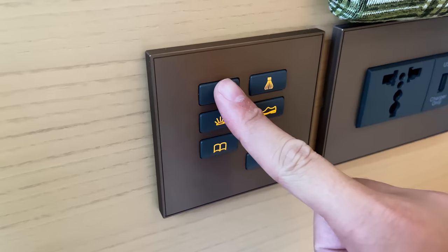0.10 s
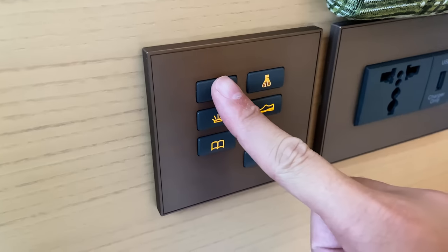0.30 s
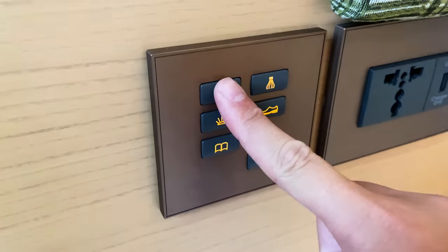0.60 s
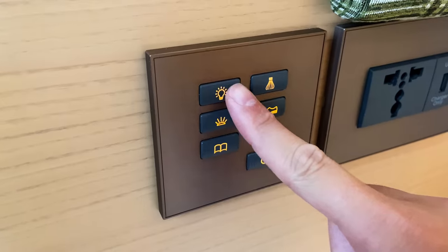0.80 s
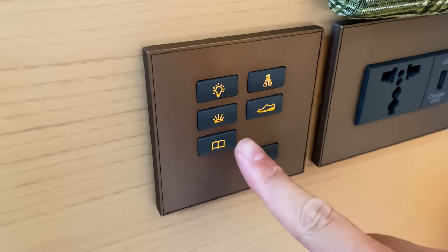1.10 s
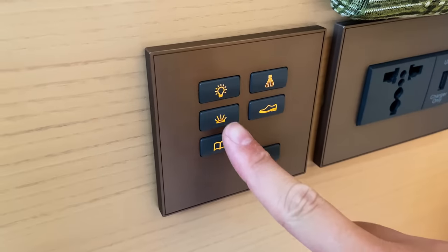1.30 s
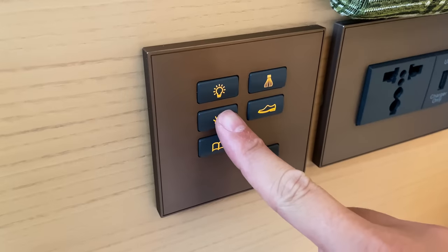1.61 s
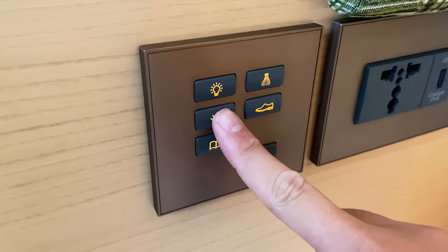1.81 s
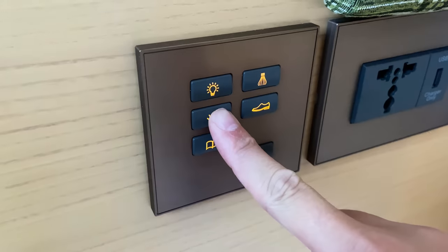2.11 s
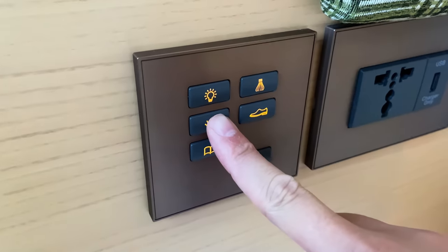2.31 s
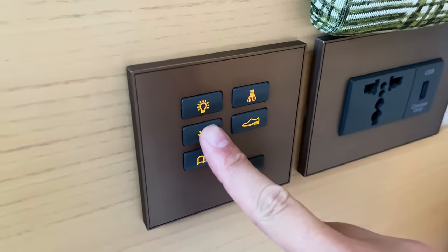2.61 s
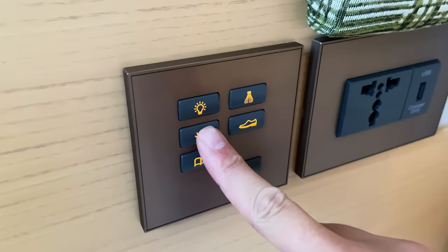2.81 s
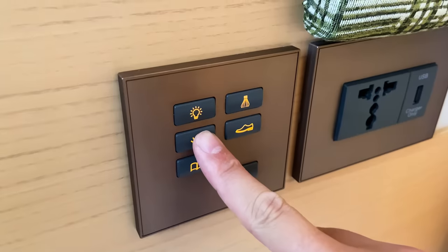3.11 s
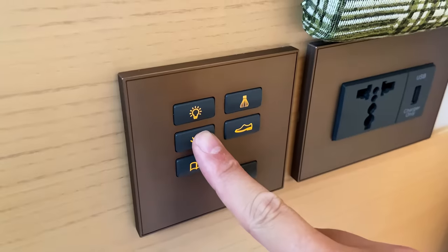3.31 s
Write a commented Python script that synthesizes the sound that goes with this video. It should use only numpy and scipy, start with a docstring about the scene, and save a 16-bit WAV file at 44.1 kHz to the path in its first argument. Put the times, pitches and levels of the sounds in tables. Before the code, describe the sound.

Small buttons click sharply as a finger presses a wall panel three times, each press and release a pair, with a light tick before the second. The close microphone also catches the quiet room's rumble and a faint engine-like drone.

```python
"""A quiet hotel room, a stereo microphone close to the bedside panel.
A finger works two push-buttons, the upper once, the lower twice. Each snaps going down and again
springing back, ringing its cap and the wall plate; the room answers briefly. Behind them lie the
building's rumble and a low drone that climbs slowly, like an engine gathering speed outside."""
import sys
import numpy as np
from scipy import signal
from scipy.fft import rfft, irfft, next_fast_len
from scipy.io import wavfile

SR = 44100
rng = np.random.default_rng(int(sys.argv[2]) if len(sys.argv) > 2 else 0)


def persist_wave(psi):
    """Save psi, clipped to +-1, as 16-bit WAV."""
    counts = np.round(np.clip(psi, -1, 1) * 32767).astype(np.int16)
    wavfile.write(sys.argv[1], SR, np.atleast_2d(counts).T)


N = 152145
TIME = np.arange(N) / SR
TREBLE_HZ = 4000   # a sharper snap lifts everything above this


def from_db(db):
    """Decibels to gain."""
    return 10 ** (np.asarray(db) / 20)


def at_hz(rows, hz, column=1):
    """Read one column of a table on a log-frequency axis."""
    rows = np.array(rows)
    return np.interp(np.log(np.maximum(hz, 1)), np.log(rows[:, 0]), rows[:, column])


def pan(db):
    """Left and right gains for a level difference, left minus right."""
    return from_db(np.array([[.5], [-.5]]) * db)


def high_pass(x, hz):
    """Gentle first-order high-pass."""
    return signal.sosfilt(signal.butter(1, hz, "high", fs=SR, output="sos"), x)


def band_pass(x, edges_hz):
    """Butterworth band-pass."""
    return signal.sosfilt(signal.butter(2, edges_hz, "band", fs=SR, output="sos"), x)


def convolve(x, response):
    """Play a sound through a stereo response."""
    return signal.fftconvolve(np.atleast_2d(x), response, axes=1)[:, :N]


def dying_noise(t60_s, delay_s=0):
    """Stereo noise of unit energy that starts after a delay and dies away."""
    t = TIME[:SR // 2] - delay_s
    burst = rng.standard_normal((2, len(t))) * (t >= 0) * from_db(-60 * np.maximum(t, 0) / t60_s)
    return burst / np.sqrt(np.sum(burst ** 2, axis=1, keepdims=True))


def room_tone(level_db=-52):
    """Building rumble and faint high microphone hiss; the bass is alike at both microphone ports."""
    # spectrum of rumble and hiss: f/Hz, relative level/dB
    spectrum = [(25, -18.5), (45, -6.5), (70, 5), (110, 3), (150, -12.5), (190, -5), (250, -12.5),
                (320, -20.5), (550, -28.5), (680, -30), (820, -24.5), (1050, -32.5), (1500, -31),
                (2300, -32.5), (3300, -46.5), (6000, -49), (8500, -52.5), (12000, -58), (16000, -67)]
    # thin bands of high microphone hiss: f/Hz, half-width/Hz, relative level/dB
    whines = [(9200, 50, -41.5), (10420, 290, -46)]
    # the noise at the two ports: f/Hz, likeness (-1..1), left minus right/dB
    image = [(60, 0.92, -1), (138, 0.79, -4), (295.5, 0.16, -1), (817, -0.17, 2.5), (8000, -0.12, 1.5)]
    size = next_fast_len(N)
    mid, side = rfft(rng.standard_normal((2, size)))
    hz = np.arange(len(mid)) * SR / size
    alike = at_hz(image, hz)
    stereo = np.sqrt(1 + alike) * mid + np.sqrt(1 - alike) * side * np.array([[1], [-1]])
    colour = from_db(at_hz(spectrum, hz))
    for centre, width, db in whines:
        colour += from_db(db) * np.exp(-.5 * ((hz - centre) / width) ** 2)
    noise = irfft(stereo * colour * pan(at_hz(image, hz, column=2)), size)[:, :N]
    return from_db(level_db) * noise / np.std(noise)


def drone(start_hz=51.2, climb_hz_per_s=7.1, left_lag_s=0.0023):
    """One low engine note from outside, a little to the right, climbing as it swells and fades."""
    # swell of the note in the room: t/s, level/dB
    swell = [(0, -67), (.18, -52), (.3, -44.5), (.45, -47), (.72, -38), (.84, -40.5), (.89, -47),
             (1.0, -38.5), (1.12, -40.5), (1.32, -34), (1.52, -34.5), (1.68, -42), (1.83, -52.5),
             (1.94, -41.5), (2.15, -45), (2.27, -55.5), (2.4, -47.5), (2.52, -56), (2.68, -43),
             (3.04, -42.5), (3.2, -51), (3.45, -51.5)]
    t = TIME - np.array([[left_lag_s], [0]])
    cycles = start_hz * t + climb_hz_per_s * t ** 2 / 2
    level = from_db(np.interp(TIME, *np.transpose(swell)))
    return pan(db=-3.5) * level * np.sqrt(2) * np.sin(2 * np.pi * cycles)


def room(x):
    """Quick scatter off the wall and table close by, then a short tail that dies band by band."""
    # the room's tail: f/Hz, level against the direct sound/dB, t60/s
    tail = [(297.3, -7, 0.32), (700, -10.5, 0.19), (1500, -17, 0.35), (3000, -14, 0.3), (5000, -17, .28),
            (8000, -19.5, .25), (12000, -30, 0.42), (16000, -29.5, .2)]
    response = from_db(-12.5) * dying_noise(t60_s=0.024, delay_s=0.0023)
    edges = np.geomspace(200, 17000, 14)
    for low, high in zip(edges, edges[1:]):
        hz = np.sqrt(low * high)
        decay = dying_noise(t60_s=at_hz(tail, hz, column=2), delay_s=0.0099)
        response += from_db(at_hz(tail, hz)) * band_pass(decay, [low, high])
    return convolve(x, response)


def brush(at_s=1.555, width_s=0.02, centre_hz=3990, level_db=-78):
    """A brief soft hiss of skin sliding on the cap as the fingertip lands."""
    edges_hz = centre_hz * np.exp([-0.126, 0.126])
    hiss = band_pass(rng.standard_normal((2, N)), edges_hz)
    envelope = np.exp(-.5 * ((TIME - at_s) / width_s) ** 2)
    return from_db(level_db) * hiss / np.std(hiss) * envelope


def impulses(snaps):
    """One sharp impulse for each snap, with its own share of treble."""
    clicks = np.zeros(N)
    for s, db, treble_db in snaps:
        click = np.zeros(N)
        click[int(s * SR)] = from_db(db)
        clicks += click + (from_db(treble_db) - 1) * high_pass(click + 1e-18, TREBLE_HZ)
    return clicks


def button(clicks, modes, build_cycles=5.9):
    """Each impulse gives a dry crack of the spring and rings the modes of cap and plate."""
    # the panel at the two microphone ports: f/Hz, left minus right/dB, left's phase lead/rad
    ports = [(500, 2, .6), (750, 1.5, .5), (1000, 7, .4), (1550, 2, 1.6), (1880, 4, .8), (2400, 0, 2.2),
             (3100, -1, 2.8), (4000, 0, -1.1), (4800, 3, .2), (6200, 1, .2), (8000, 3, -.9),
             (12000, 0, -1.1), (14500, 0, 2)]
    t = TIME[:SR // 4]
    crack = from_db(-15) * high_pass(dying_noise(t60_s=.005), TREBLE_HZ)[0, :len(t)]
    body = np.zeros((2, len(t)))
    for k, (hz, db, t60) in enumerate(modes):
        swell = 1 - np.exp(-t * hz / build_cycles)   # the low modes arrive last
        envelope = swell * from_db(-60 * t / t60)
        lead = np.array([[.5], [-.5]]) * at_hz(ports, hz, column=2)
        ring = 2 * envelope / envelope.sum() * np.cos(2 * np.pi * hz * t + lead)
        body += (-1) ** k * from_db(db) * pan(at_hz(ports, hz)) * ring
    return convolve(clicks, crack + body)


def scene():
    """The panel's clicks up close, the room around them, drone and room tone behind."""
    # each button's snaps, press then release: t/s, level/dB, treble lift/dB
    upper_snaps = [(0.4552, -3.5, -4), (0.6183, -1.5, 2)]
    lower_snaps = [(1.8647, -1, -4), (2.0592, 0.5, 0.5), (2.8458, -2, -3.5), (3.0201, 0, 1.5)]
    # the fingertip takes up the lower button's play: t/s, level/dB, treble lift/dB
    touches = [(1.5931, -9, -13)]
    # modes rung by each button and by the light touch: f/Hz, resonance height/dB, t60/s
    upper_modes = [(388, -7, .03), (505, -14, 0.075), (680, -3, 0.036), (812, 7.5, .042),
                   (1002, 1.5, 0.013), (1185, 5, 0.012), (1564, 6.5, 0.019), (1890, 1, 0.02),
                   (2350, -6, 0.0099), (2860, 1.5, .009), (4110, 3, 0.0052), (5100, -4, .005),
                   (6200, 0.5, .005), (7250, -8, .004), (10170, -10.5, 0.0021), (11600, -4, .003),
                   (14500, 2, 0.0037)]
    lower_modes = [(357.6, -6, 0.075), (480, -6.5, 0.014), (696, -0.5, 0.023), (794, 6, 0.042),
                   (1012, -5, 0.0095), (1208, 1, .018), (1524, 1.5, 0.016), (1899, 8, 0.019),
                   (2400, 1, .01), (3090, 7.5, 0.0057), (3653, -6.5, 0.0065), (4743, 1.5, 0.0046),
                   (5710, -1.5, 0.0043), (7660, -0.5, 0.0033), (10600, -7, 0.009), (11700, -4, 0.0019),
                   (14550, -1, .003)]
    touch_modes = [(1290, -4, 0.012), (1570, -7.5, .026), (1880, 1.5, 0.014), (2900, -10, 0.0085),
                   (3140, -2.5, 0.015), (3950, -7.5, 0.0086), (6200, -30, 0.002)]
    upper, lower, touch = impulses(upper_snaps), impulses(lower_snaps), impulses(touches)
    panel = button(upper, upper_modes) + button(lower, lower_modes) + button(touch, touch_modes)
    # the raw snaps also reach the room from the plate's edges
    spill = from_db(-4.5) * (upper + lower) + from_db(-6) * touch
    return panel + room(panel) + room(spill) + brush() + drone() + room_tone()


def record(dry):
    """The microphone's top end is cut steeply above 16.5 kHz."""
    return signal.sosfilt(signal.ellip(10, .1, 80, 16500, fs=SR, output="sos"), dry)


dry = scene()
out = record(dry)
persist_wave(out)
```